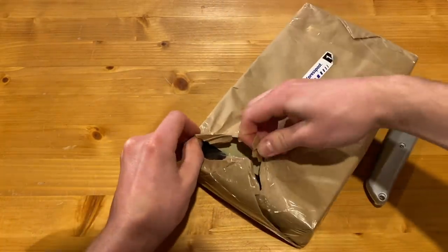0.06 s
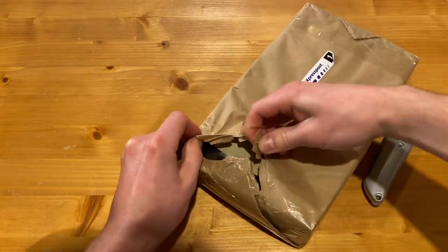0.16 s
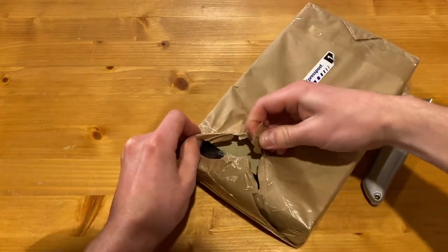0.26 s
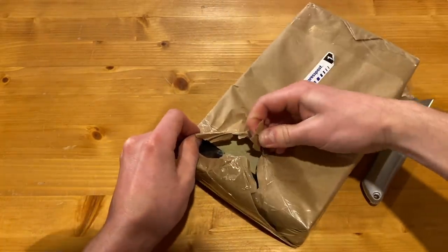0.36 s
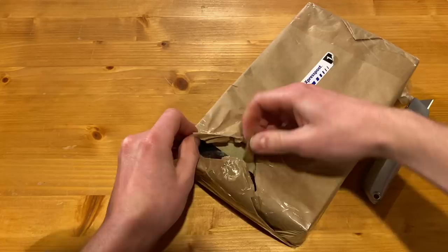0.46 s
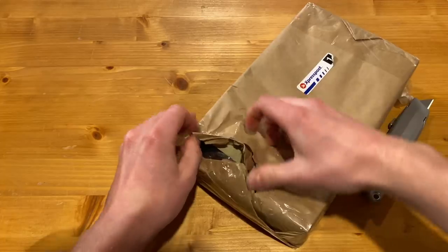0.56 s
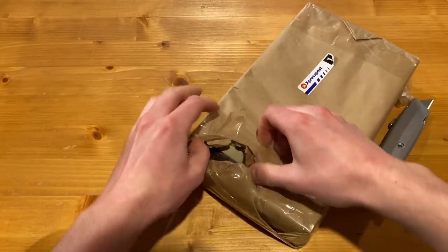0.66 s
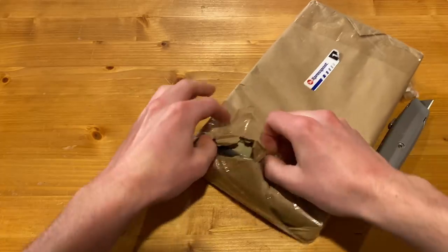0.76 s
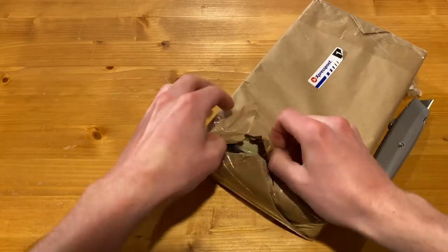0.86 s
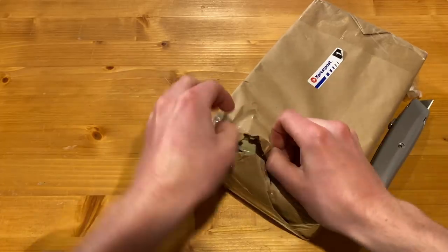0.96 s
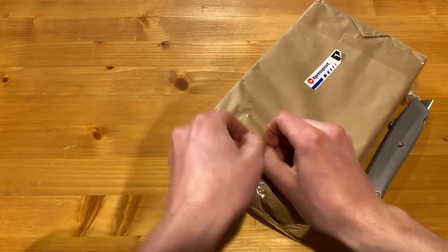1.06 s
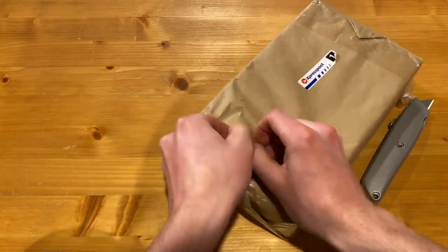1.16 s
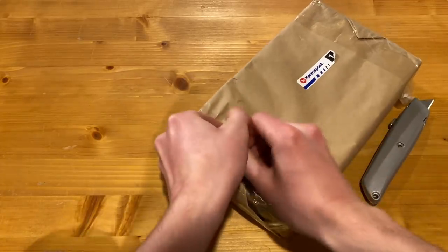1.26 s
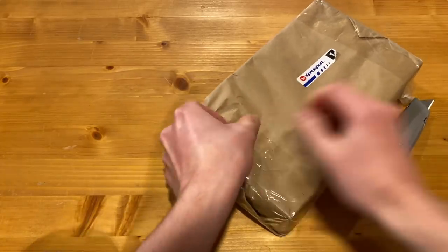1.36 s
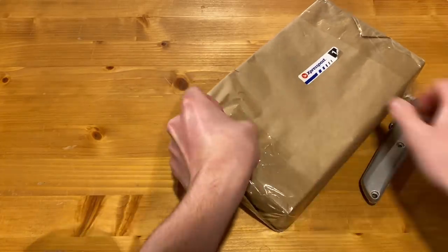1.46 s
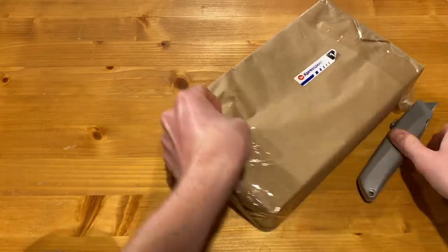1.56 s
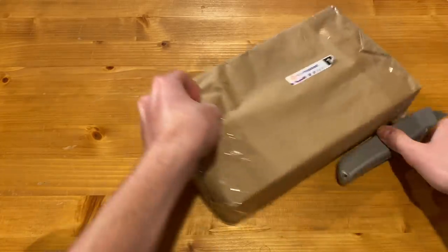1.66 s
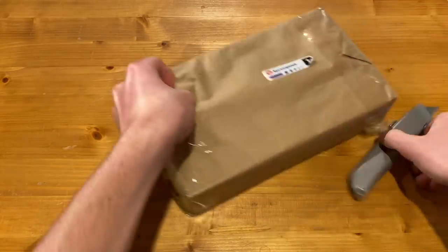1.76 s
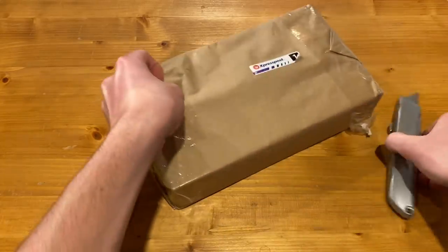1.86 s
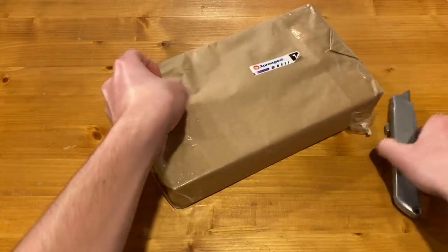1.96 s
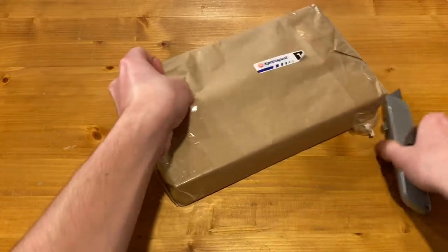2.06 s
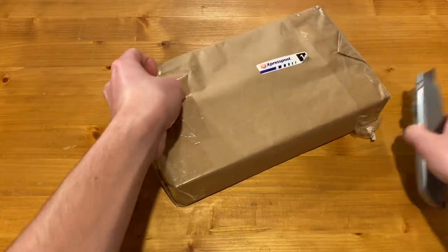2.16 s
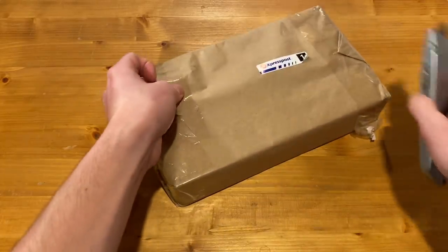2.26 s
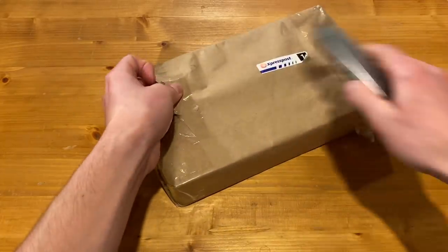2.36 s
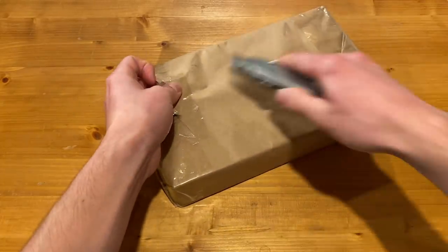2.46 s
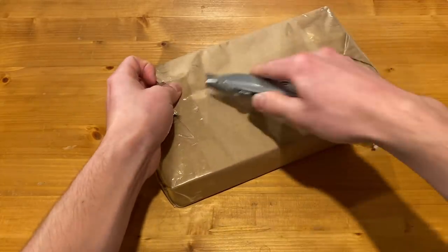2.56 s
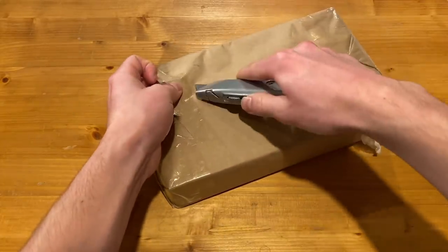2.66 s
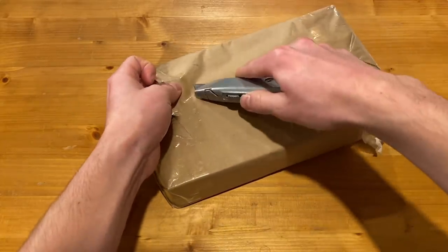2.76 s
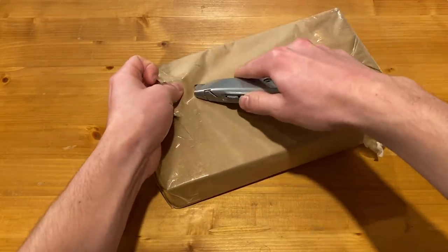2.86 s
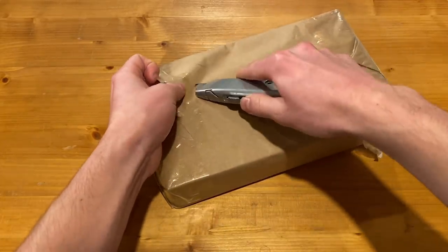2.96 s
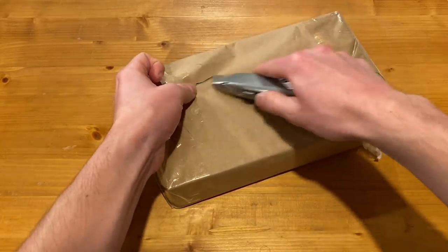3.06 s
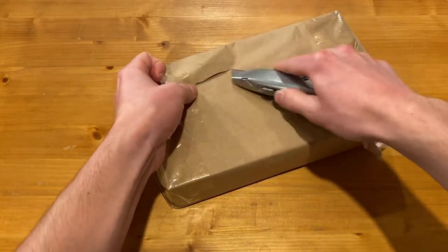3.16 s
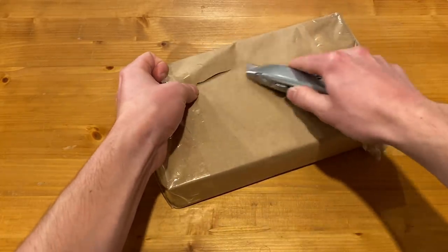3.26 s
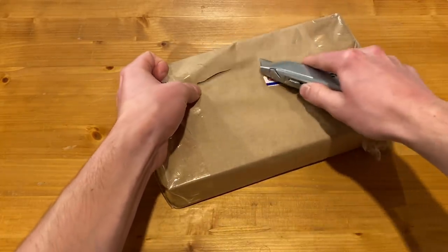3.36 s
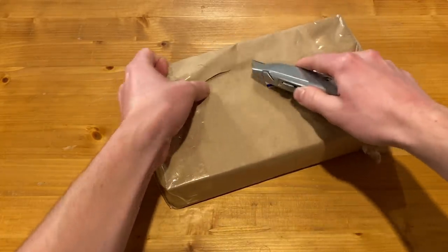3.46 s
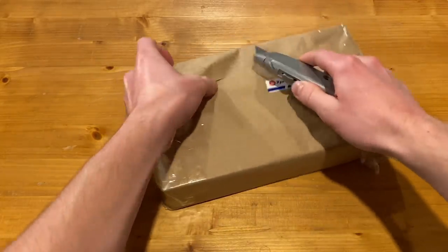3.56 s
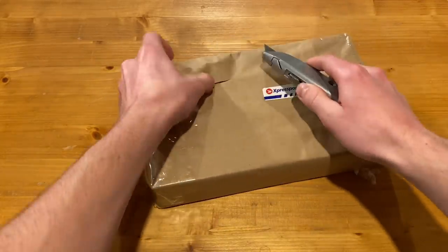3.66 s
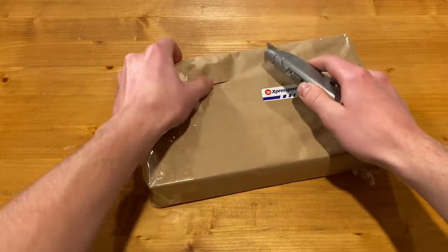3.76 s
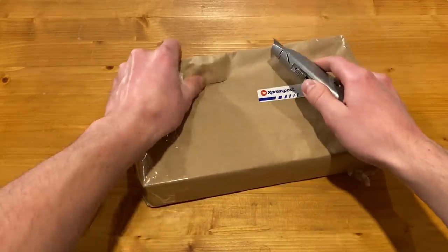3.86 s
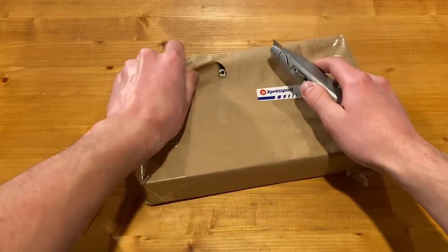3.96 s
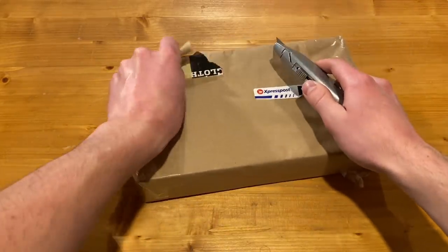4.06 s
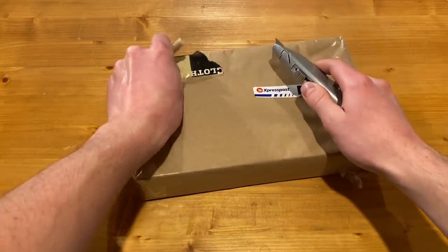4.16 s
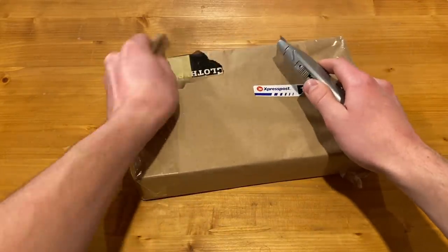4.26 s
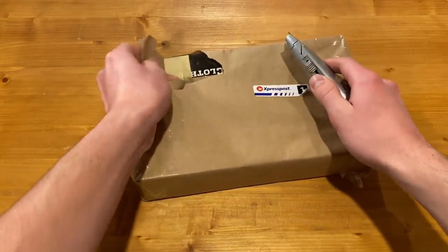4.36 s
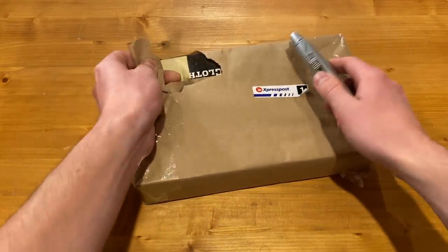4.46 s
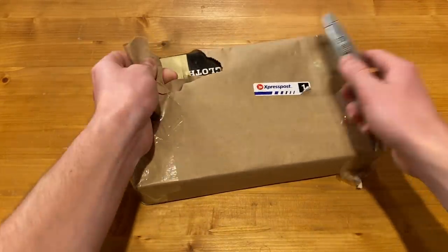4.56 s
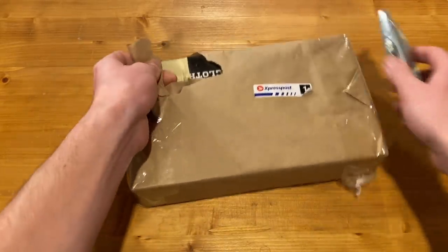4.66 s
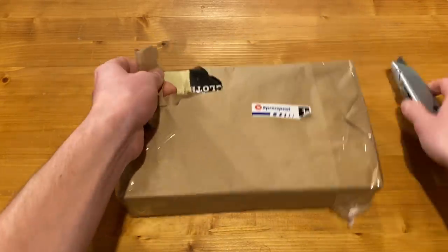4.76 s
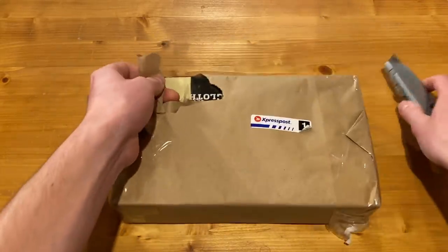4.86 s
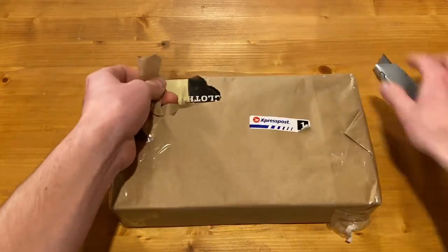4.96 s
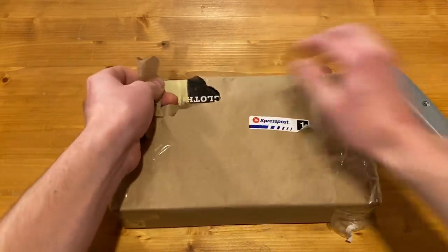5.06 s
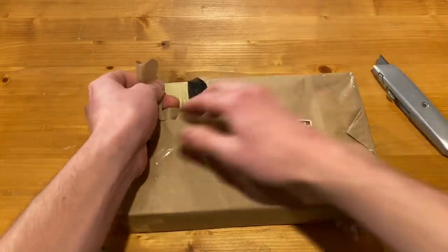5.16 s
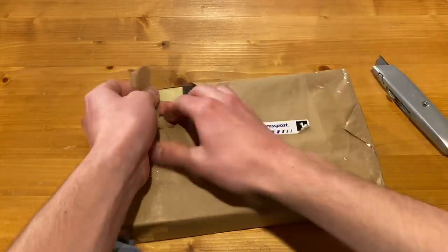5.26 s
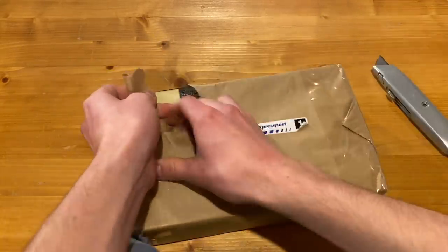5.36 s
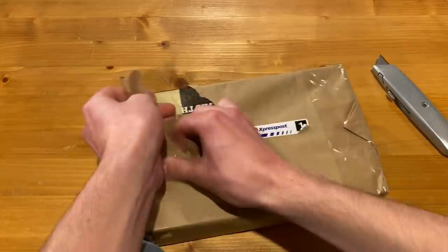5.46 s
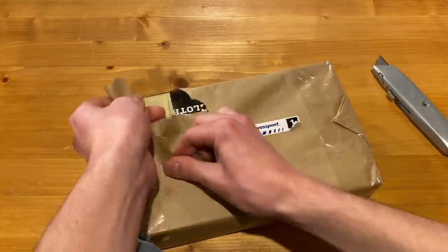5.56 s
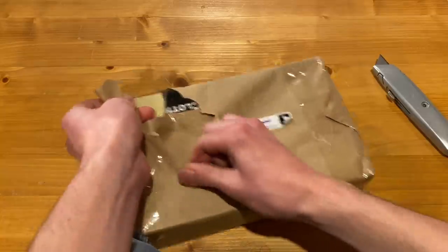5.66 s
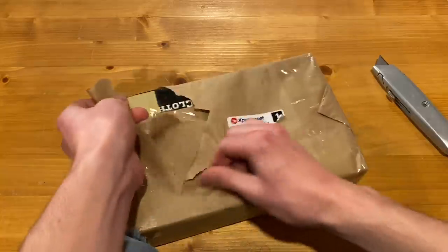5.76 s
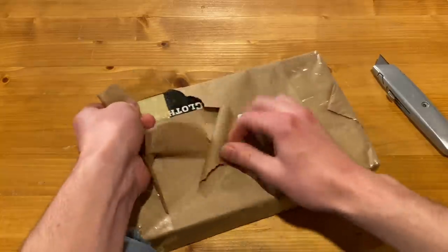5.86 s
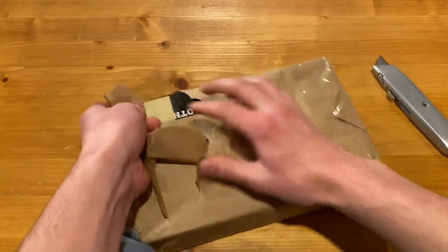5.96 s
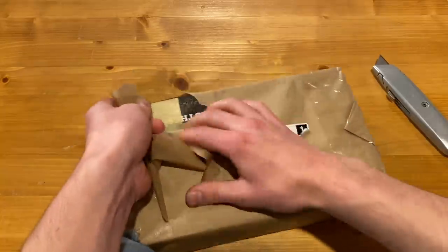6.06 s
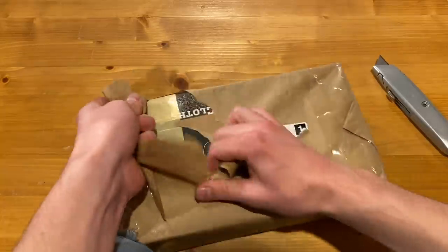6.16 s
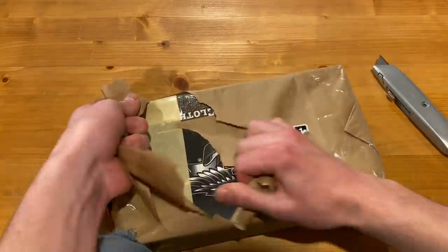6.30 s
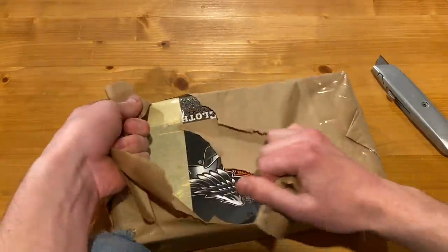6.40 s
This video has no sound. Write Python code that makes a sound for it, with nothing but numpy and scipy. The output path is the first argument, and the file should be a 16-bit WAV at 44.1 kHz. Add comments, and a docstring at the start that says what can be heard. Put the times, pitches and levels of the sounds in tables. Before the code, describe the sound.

Hands pick at stiff, taped wrapping paper on a hollow parcel, with light crackles and small pops. The parcel scuffs round on a wooden table, a blade rasps briefly, and a strip rips open. A metal knife is put down with a hard knock and small rattle, then the paper tears much louder. Close microphone, small quiet room.

```python
"""A quiet room with a wooden table: hands pick at, slit and tear the brown paper round a parcel.
Noise in dense grains makes the rustle, the blade's rasp and the scuff; short noise bursts make the snaps.
The hollow parcel booms through low resonances; fading sine tones make paper pops and the knife's knocks.
A finger makes the paper hum. The surface below echoes the paper, and the walls add a short tail."""
import sys
import numpy as np
from scipy import signal
from scipy.fft import rfft, irfft, next_fast_len
from scipy.io import wavfile
from scipy.ndimage import uniform_filter1d

SR = 44100
rng = np.random.default_rng(int(sys.argv[2]) if len(sys.argv) > 2 else 0)


def transcribe(u):
    """Save the signal u as a 16-bit wav file named by the first command-line argument.

    u: samples, shape (n,) or (channels, n), limited to [-1, 1]; the rate is SR.
    q: integer samples, one column per channel.
    """
    v = np.clip(np.atleast_2d(u).T, -1, 1)
    q = np.round(v * 32767).astype(np.int16)
    wavfile.write(sys.argv[1], SR, q)


N = 283563
TIME = np.arange(N) / SR  # seconds

# each move of the hands on the paper; swell and fade are the times for a 20 dB change:
# peak t/s, swell t/s, fade t/s, rustle level/dB, treble over middle level/dB, parcel boom level/dB
HAND_MOVES = [(0.0, .05, 0.11, -42.5, 5, -37.5), (0.294, 0.5, 0.11, -44, 5.5, -51),
              (.377, 0.04, .04, -49, 5, -52.5), (.493, 0.024, 0.13, -46, -0.5, -52.5),
              (.65, .05, 0.17, -47, 4, -60), (.705, .18, 0.069, -48, 5, -52.5),
              (.9, 1, 0.33, -54.5, 5, -61), (1.119, 0.059, 0.13, -45.5, 12, -53),
              (1.223, 0.12, 0.11, -45.5, 4, -52), (1.341, 0.047, 0.24, -53, 0, -50.5),
              (1.688, 0.45, 0.065, -49, 2.5, -50.5), (1.72, 0.027, 0.22, -41, 3, -47.5),
              (1.98, 0.08, 0.17, -56, -1, -61), (2.077, 0.044, 0.42, -51.5, 1, -53.5),
              (2.227, 0.07, 0.086, -51, -5, -55), (2.297, 0.039, .1, -56, 2, -56),
              (2.349, 0.11, 0.06, -49.5, 2, -53), (2.51, 0.098, 0.046, -52, -11, -65),
              (2.679, 0.011, .13, -42.5, -11, -53), (2.878, 0.17, 0.057, -41.5, 4.5, -51),
              (3.043, 0.028, 0.53, -45, 3, -54), (3.197, 0.47, 0.035, -48.5, -7, -56.5),
              (3.308, 0.047, 0.087, -48, 1, -56), (3.39, 0.11, .03, -49, -7, -56),
              (3.52, 0.026, .2, -59, -8, -62), (3.577, 0.0078, 0.22, -42, 3, -59),
              (3.702, 0.62, 0.26, -48.5, -9, -50), (3.869, 0.12, 0.15, -43.5, 0.5, -58),
              (4.029, 0.15, 0.059, -29.5, 9, -42), (4.118, 0.055, 0.071, -32, 1, -40.5),
              (4.308, 0.18, 0.4, -41.5, 4, -51.5), (4.46, 0.034, 0.038, -37, -12, -66),
              (4.633, 0.39, 0.23, -57.5, -6, -51.5), (4.77, 0.051, 0.43, -45.5, 1.5, -67),
              (4.933, 0.017, 0.11, -40, -2, -53), (5.242, 0.02, 0.038, -36, -1.5, -42.5),
              (5.28, 0.077, 0.12, -53, -5, -58), (5.428, 0.055, 0.075, -38.5, 0, -49),
              (5.49, 0.23, .1, -45, 8, -52), (5.536, 0.021, .12, -28.5, 0.5, -42),
              (5.647, 0.055, 0.055, -39, 5, -49), (5.733, 0.082, 0.11, -34, 1, -39.5),
              (5.795, 0.052, 0.26, -31, 8, -43), (5.85, .06, 0.079, -31.5, 5, -49),
              (5.896, 0.13, 0.042, -24, 0.5, -38.5), (5.95, 0.12, 0.21, -42, -15, -50),
              (6.078, 0.022, 0.1, -36, -8, -40), (6.168, 0.03, 0.37, -25.5, -1, -38.5),
              (6.27, 0.27, .4, -32.5, 9.5, -45), (6.4, 0.44, 0.33, -31.5, 2, -44.5)]


def undb(db):
    """Turn decibels into a plain gain."""
    return 10 ** (np.asarray(db) / 20)


def unit(x):
    """Scale a sound to an average (rms) level of 1."""
    return x / np.sqrt(np.mean(x ** 2))


def colour(x, points):
    """Shape the tone by gains in dB at given frequencies in Hz, joined by straight lines over log f."""
    hz, db = np.transpose(points)
    size = next_fast_len(len(x))
    log_f = np.log(np.maximum(np.fft.rfftfreq(size, 1 / SR), 1))
    gain = undb(np.interp(log_f, np.log(hz), db))
    return irfft(rfft(x, size) * gain, size)[:len(x)]


def band(x, hz, width_hz):
    """Let one resonance ring, with gain 1 at its centre."""
    hz = min(hz, .45 * SR)
    return signal.lfilter(*signal.iirpeak(hz, hz / width_hz, fs=SR), x)


def high_pass(x, hz):
    """Keep what lies above a frequency."""
    return signal.sosfilt(signal.butter(2, hz, "high", fs=SR, output="sos"), x)


def decay(t, t60_s):
    """Die away by 60 dB in the given time."""
    return np.exp(-np.log(1000) * t / t60_s)


def blend(first, second, db):
    """Mix two sounds, the first stronger by db, at constant power."""
    return (undb(db) * first + second) / np.hypot(1, undb(db))


def grains(spread_db, per_s, length_s):
    """Noise in short dying bursts at random moments, a few large among many small; rms near 1."""
    chance = rng.random((N, 2)).T
    sizes = undb(-spread_db * np.log(1 - chance[1]))
    hits = (chance[0] < per_s / SR) * sizes
    shape = signal.lfilter([1], [1, -np.exp(-1 / (length_s * SR))], hits)
    # even out the level over 1/16 s, so that only the grain remains
    local = np.sqrt(uniform_filter1d(shape ** 2, size=SR // 16)) + 1e-9
    return shape / local * rng.standard_normal(N)


def follow(table):
    """Read the columns of a table over time, sample by sample."""
    s, *columns = np.transpose(table)
    return [np.interp(TIME, s, c) for c in columns]


def swell(table, edge_s=.01):
    """Gain along a table of t/s and level/dB, closing at both ends."""
    s, db = np.transpose(table)
    edges = np.clip(np.minimum(TIME - s[0], s[-1] - TIME) / edge_s, 0, 1)
    return edges * undb(np.interp(TIME, s, db))


def surge(peak_s, swell_s, fade_s):
    """Power of each move, at every 64th sample: it rises and falls by 20 dB in the given times."""
    late = TIME[::64] - np.reshape(peak_s, (-1, 1))
    span = np.where(late < 0, -np.reshape(swell_s, (-1, 1)), np.reshape(fade_s, (-1, 1)))
    return undb(-40 * np.abs(late / span))  # 40, because this is power and not gain


def summed(power, db, rest_db):
    """Gain of overlapping moves, whose powers add to a resting level."""
    return np.interp(TIME, TIME[::64], np.sqrt(undb(db) ** 2 @ power + undb(rest_db) ** 2))


def hush():
    """The quiet room: steady noise, mostly low."""
    # tone of the room noise: f/Hz, level/dB per Hz
    room_tone = [(12, 3.5), (20, 0.5), (77, -12.5), (142, -68), (422, -27), (780, -67), (1400, -94),
                 (2080, -68), (8180, -69), (9670, -77), (16000, -49)]
    return undb(-56.5) * unit(colour(rng.standard_normal(N), room_tone))


def walls(near):
    """Walls send back a dense, quickly fading tail, made with decaying noise."""
    tail_db, t60_s, build_up_s = -11.5, 0.096, 0.0065
    t = np.arange(SR // 3) / SR
    reflections = rng.standard_normal(len(t)) * decay(t, t60_s) * np.minimum(t / build_up_s, 1)
    reflections = reflections / np.sqrt(np.sum(reflections ** 2))
    return undb(tail_db) * signal.fftconvolve(near, reflections)[:N]


def parcel(x):
    """The hollow box under the paper rings low."""
    # resonances of the box: f/Hz, width f/Hz, level/dB
    resonances = [(222.4, 62, -6.5), (374, 103.6, 4), (537, 630, -2.5), (905, 322, -2), (1640, 880, -21)]
    return sum((-1) ** k * undb(db) * band(x, hz, width)
               for k, (hz, width, db) in enumerate(resonances))


def weight():
    """Shifting pressure booms in the parcel; jolts also shake the lowest modes of the table."""
    # the parcel is jolted against the table: t/s, parcel boom level/dB, table rumble level/dB
    jolt_table = [(0.0, -50, -38), (.2, -48, -50.5), (1.22, -57, -62), (1.43, -59, -57), (1.77, -57, -51),
                  (2.02, -51.5, -51.5), (2.72, -53, -65), (3.04, -49, -67), (3.63, -55, -53.5),
                  (3.9, -51, -63), (4.12, -47, -56), (4.82, -62, -47.5), (4.99, -36.5, -37),
                  (5.232, -54, -52.5), (5.53, -47, -47), (5.87, -50, -48), (6.09, -46, -58),
                  (6.21, -36.5, -59), (6.32, -33, -70)]
    jolt_swell_s, jolt_fade_s = 0.065, 0.096
    rest_boom_db, rest_table_db = -65.5, -68.5  # a murmur remains between the moves
    s, swell_s, fade_s, *_, hand_db = np.transpose(HAND_MOVES)
    jolt_s, boom_db, table_db = np.transpose(jolt_table)
    jolts = surge(jolt_s, jolt_swell_s, jolt_fade_s)
    moves = np.vstack([surge(s, swell_s, fade_s), jolts])
    pressure = summed(moves, np.r_[hand_db, boom_db], rest_boom_db)
    push = blend(grains(2.0, 300, 0.0039), rng.standard_normal(N), 4.7)
    boom = unit(parcel(push))
    rumble = unit(band(band(rng.standard_normal(N), 132, 180), 132, 180))
    return pressure * boom + summed(jolts, table_db, rest_table_db) * rumble


def scuff():
    """The parcel is turned, paper on varnished wood: a dull, slightly catching rub made of grains."""
    # loudness of the rub: t/s, level/dB
    strength = [(1.56, -67), (1.584, -77), (1.594, -51), (1.672, -49), (1.686, -56), (1.844, -46.5),
                (1.944, -57.5), (1.97, -70)]
    # tone of the rub: f/Hz, level/dB per Hz
    tone = [(59, -38), (100, -2), (157, 4.5), (733, -2), (823, -10), (1070, 2), (2200, -25), (2860, -49),
            (4840, -120)]
    return unit(colour(grains(1.5, 1300, 0.0082), tone)) * swell(strength)


def knife():
    """Each contact with the table rings the same modes, brighter when hard; loose parts rattle on."""
    # the knife is laid down and bounces: t/s, peak level of the ring/dB, hardness from 0 to 1
    knocks = [(4.808, -45, 0), (4.921, -11.5, 0.75), (4.939, -47, 0.9), (4.984, -22, 0.36),
              (5.017, -34, 0.3), (5.053, -35, 0.24)]
    # modes of knife and table top: f/Hz, level before softening/dB, time to fall 60 dB t/s
    modes = [(93.5, -12, 0.1), (130, -3.5, 0.066), (219, -28, 0.088), (344, 1.5, 0.049), (540, -7.5, 0.099),
             (755, -27, 0.094), (911, -1, 0.083), (994, 11.5, 0.021), (1200, -4, 0.049), (1265, -6, 0.077),
             (1647, -11, 0.05), (1720, -10, 0.046), (2030, -13, 0.14), (2080, -11, .05), (2254, 3, 0.025),
             (2450, 2.5, 0.018), (2695, 4, 0.045), (4450, -13, .03), (10300, -18, .03)]
    rattle_db, rattle_t60_s = -9.5, 0.14
    out, t = np.zeros(N + SR), np.arange(SR // 3) / SR
    for s, db, hard in knocks:
        edge_hz = 150 * 60 ** np.clip(hard, 0, 1)  # a soft contact lasts longer and dulls the ring
        ring = np.zeros(len(t))
        for k, (hz, mode_db, t60_s) in enumerate(modes):
            strength = (-1) ** k * undb(mode_db) / np.hypot(1, (hz / edge_hz) ** 2)
            ring += strength * decay(t, t60_s) * np.sin(2 * np.pi * hz * t)
        ring = ring / np.abs(ring).max()
        rattle = undb(rattle_db) * rng.standard_normal(len(t)) * decay(t, rattle_t60_s)
        rattle = rattle / np.sqrt(SR * 0.005)
        i = int(s * SR)
        out[i:i + len(t)] += undb(db) * (ring + signal.fftconvolve(ring, rattle)[:len(t)])
    return out[:N]


def hum():
    """A finger drags on the taut paper and it hums: one short, low, gliding sine tone."""
    # path of the tone: t/s, f/Hz, level/dB
    path = [(5.172, 349.5, -70), (5.19, 336, -40.5), (5.214, 343, -51), (5.252, 370, -41.5),
            (5.27, 369, -72)]
    hz, _ = follow(path)
    gain = np.sqrt(2) * swell([(s, db) for s, _, db in path])  # root 2 makes the level an rms one
    return gain * np.sin(2 * np.pi * np.cumsum(hz) / SR)


def pops():
    """A slack panel of paper jumps in or out and rings briefly at its own pitch, sagging a little."""
    # each pop: t/s, peak level of its envelope/dB, starting f/Hz, time to fall 60 dB t/s
    panels = [(0.155, -40, 333, 0.073), (0.175, -36.5, 536, 0.056), (1.124, -50, 380, 0.02),
              (1.375, -38.5, 156, 0.031), (2.026, -40.5, 345, 0.036), (2.156, -38.5, 387, 0.045),
              (2.236, -40, 376, 0.044), (2.456, -48, 1014, 0.05), (2.715, -37.5, 395, 0.078),
              (2.869, -37.5, 355, 0.057), (3.185, -39, 459, 0.089), (3.594, -35.5, 417, 0.023),
              (3.643, -31.5, 247, 0.037), (4.104, -30.5, 273, 0.037), (4.772, -37.5, 345, 0.033),
              (5.361, -44.5, 340, 0.14), (5.643, -38, 227, 0.056), (5.734, -28, 436, 0.041),
              (5.948, -54, 730, 0.033), (6.03, -34, 380, 0.026), (6.082, -29.5, 364, 0.076),
              (6.33, -39, 500, 0.046)]
    out, t = np.zeros(N + SR), np.arange(SR // 8) / SR
    for s, db, hz, t60_s in panels:
        fall = (1 - np.exp(-t / 0.00058)) * decay(t, np.clip(t60_s, .01, .15))
        tone = np.sin(2 * np.pi * hz * t * (1 - 0.43 * t))
        i = int(s * SR)
        out[i:i + len(t)] += undb(db) * fall / fall.max() * tone
    return out[:N]


def rasp():
    """Fibres break so fast along a cut or rip that their grains merge into a dense scrape."""
    # the blade slits the sheet, later a strip is ripped; one list for each: t/s, level/dB
    strokes = [
        [(3.02, -53), (3.046, -38), (3.064, -43), (3.14, -37.5), (3.18, -42.5), (3.196, -44), (3.25, -59)],
        [(3.96, -38), (3.966, -41), (4.046, -33), (4.06, -38), (4.11, -37), (4.17, -55)],
    ]
    # resonances of the scrape: f/Hz, width of the first filter f/Hz, level/dB
    resonances = [(2000, 520, -16), (3420, 2900, 8), (6340, 1500, 5), (9700, 2000, 4.5)]
    fibres = grains(0.72, 5000, 0.0022)
    scrape = sum(undb(db) * band(band(fibres, hz, width), hz, 2 * width)
                 for hz, width, db in resonances)
    return unit(scrape) * sum(map(swell, strokes))


def snaps():
    """Each crease flips in a brief burst that rings its patch of paper, thumps the parcel and settles."""
    # creases that snap, levels before filters and echo:
    # t/s, peak level/dB, ring f/Hz, top treble level/dB, thump level/dB, length t/s (held to 0.4-30 ms)
    creases = [(.0089,-21,8600,1,-45,.001),(0.021,-22,8300,2,-31,0.0045),(.0864,-27,2550,0,-40,.0047),(.091,-25,8200,-3,-36,.0019),(0.112,-25.5,8760,-6,-43,0.0013),(0.15,-26.5,7400,-14,-33,0.004),(0.175,-25,6700,-17,-29,0.0012),(.216,-22,2560,-2,-57,0.0015),(0.224,-20.5,4590,3,-48,.001),(0.246,-21,7520,6,-54,.0012),(0.2837,-18,8900,4,-40,0.0022),(0.2896,-22,6630,-6,-28,0.0015),(.301,-25,3530,-4,-42,0.0015),(.3567,-25.5,8400,11,-50,.0017),(.4665,-34,8010,7,-46,.0007),(0.485,-33,7900,-8,-41,0.0014),(0.49,-29,8530,-9,-28,0.00058),(0.5245,-29,3620,1.5,-42,0.0094),(0.59,-30.5,4740,1,-47,0.0011),(.635,-35,7490,-6,-43,.0013),(.66,-28,7100,-12,-40,0.0014),(.699,-32,4140,-6,-38,.0023),(0.74,-39,4950,-8,-47,0.0014),(.8212,-33.5,4600,-3,-41,0.0016),(0.866,-32.5,3630,-17,-63,0.00082),(0.8913,-26,6700,-16,-64,0.0013),(0.945,-35.5,8900,5,-62,0.0024),(0.9656,-38,2840,7,-40,0.0069),(1.067,-35.5,4050,-8,-42,0.0019),(1.0832,-29.5,7200,-7,-34,0.00097),(1.108,-31,7060,-8,-54,0.0009),(1.116,-35.5,8350,-11,-36.5,0.0088),(1.1905,-29,8400,12,-49,.0024),(1.2086,-21,8400,10,-48,0.001),(1.211,-24.5,8440,2,-31.5,0.0022),(1.255,-33,7880,-5,-47,.0016),(1.3125,-30,6850,-5,-63,.0027),(1.338,-31.5,3880,2,-36.5,0.0023),(1.533,-34,8500,-11,-57,.0013),(1.5446,-35,2820,-12,-31,0.0012),(1.628,-26.5,6660,-18,-41,0.00059),(1.655,-35.5,4100,-28,-40.5,0.0063),(1.699,-30,4550,2,-52,0.01),(1.732,-26.5,4500,3,-34,0.0014),(1.8227,-28,4200,0,-46,0.0064),(1.862,-27,3770,-14,-42,.0011),(1.914,-30.5,8400,3,-62,.005),(2.02,-37,5170,-21,-53,.011),(2.0704,-32.5,4030,-3,-58,0.0052),(2.102,-25,6400,-22,-44,0.0018),(2.1276,-31,4820,-9,-54,.0031),(2.1525,-27.5,3980,-9,-37.5,0.0025),(2.2248,-26,3680,9,-41,.0014),(2.2334,-29,4250,-9,-35.5,0.0029),(2.2695,-31,9200,-2,-59,.0009),(2.278,-23.5,10100,4,-49,0.003),(2.293,-24,2920,-15,-55,0.002),(2.3222,-16.5,9800,7.5,-53,0.00032),(2.338,-29,7900,-3,-41,.0029),(2.385,-38,4050,2,-66,0.0041),(2.432,-38,4570,9,-65,.0057),(2.459,-35,3870,-2,-47,0.0028),(2.495,-33,3640,-10,-40.5,0.0044),(2.511,-27,4420,-10,-40,0.002),(2.6015,-44,9700,-3,-52,0.0015),(2.671,-30.5,3470,5,-66,0.0025),(2.6895,-19.5,4220,-12,-51,0.003),(2.7187,-34,2600,-15,-39,0.0039),(2.7274,-19,9400,-12,-42,0.00096),(2.776,-33,8950,-1,-43,0.0057),(2.814,-31,9820,-3,-54,.0009),(2.836,-25,9700,8,-40,.001),(2.8507,-26,9500,-14,-55,0.001),(2.866,-28.5,9350,-12,-43.5,0.007),(2.966,-34,2730,5,-47,.0022),(2.998,-31.5,2640,-17,-57,0.0042),(3.023,-31,3700,-3,-46,.0016),(3.1954,-28,3480,-30,-61,0.0028),(3.2928,-24,3340,-23,-35,0.0057),(3.37,-36.5,6400,-17,-37,0.0041),(3.429,-35.5,9100,-8,-68,0.0014),(3.5367,-39,3960,-19,-42.5,0.0044),(3.5576,-23,6840,-10,-47,0.0029),(3.5847,-18.5,5860,-9,-38,0.0014),(3.6386,-16.5,10600,-8,-33.5,0.0045),(3.666,-21.5,2690,-21,-52,0.0023),(3.69,-14.5,2780,2,-41,0.003),(3.7,-21.5,2670,-17,-55,0.0021),(3.773,-19.5,4600,-19,-44,0.0027),(3.806,-29,2740,-6,-55,0.0012),(3.8219,-26,4070,-14,-49,.0014),(3.868,-27.5,9000,-10,-56,.0033),(3.925,-12.5,6400,4,-29,0.00031),(3.9507,-25,2450,-19,-46,0.0025),(3.959,-20,2500,-1,-55,0.0021),(3.977,-11.5,6640,4,-42,.0018),(4.016,-17.5,2980,3,-40,0.0042),(4.029,-15,5800,2,-37,0.0023),(4.041,-21,3040,-14,-47,.0036),(4.078,-16.5,3200,-13,-59,0.0013),(4.0866,-19,3230,-11,-39,.0013),(4.102,-13,3100,-19,-43,0.0013),(4.106,-18,3250,-18,-32,.0031),(4.1118,-16.5,4700,-16,-42,.011),(4.1307,-23.5,2920,-2,-30.5,.0037),(4.312,-22.5,2680,-6,-41,0.0043),(4.319,-23.5,7160,-8,-45,0.0037),(4.373,-29,3370,0,-60,0.0027),(4.4075,-20,3270,-14,-59,.0005),(4.453,-26.5,2920,3,-57,0.0087),(4.462,-28,2840,-18,-52,0.0082),(4.4847,-31,3320,-4,-38,0.0066),(4.508,-32,6760,-14,-44,0.0042),(4.587,-36,3430,-10,-44,0.0026),(4.629,-23.5,8800,-11,-38.5,0.0018),(4.759,-32,5060,1,-53,0.019),(4.867,-31.5,4160,-10,-53,0.0013),(4.9214,-13,2870,2,-11.5,0.0038),(5.108,-34.5,9050,-12,-51,0.0025),(5.2354,-20.5,4200,4,-25,0.0012),(5.388,-28,3040,-18,-37,0.0019),(5.408,-24.5,7600,-17,-52,0.003),(5.4205,-21,2900,0,-37,0.0012),(5.4253,-19,2700,-2,-35,0.0011),(5.4414,-19.5,4770,6,-36.5,0.0023),(5.494,-24,10800,3,-38.5,.0066),(5.5237,-2,9530,-1,-15.5,0.0061),(5.538,-17,3100,-8,-52,.0048),(5.561,-24,2570,-5,-43,.014),(5.6214,-28.5,4390,-7,-47,.0016),(5.6343,-20,3040,2,-44,0.0027),(5.6432,-22,3100,-9,-32,0.0024),(5.687,-19.5,2920,-3,-31,0.0035),(5.698,-24.5,4600,-16,-48,0.0024),(5.7246,-19,4430,3,-34,0.0064),(5.7327,-24,4540,-8,-21.5,.0041),(5.7812,-11.5,9100,-14,-23.5,0.0078),(5.831,-16,8850,-15,-48,.0023),(5.837,-13,4740,1,-31,.0058),(5.846,-12,9200,-8,-27,.0086),(5.856,-17,7500,3,-34,0.019),(5.885,-9,8200,-20,-32,0.0069),(5.9004,-16,5070,5,-30.5,0.0062),(5.915,-23,4350,-10,-47,.0028),(5.948,-13,3300,-18,-30,0.0011),(5.965,-13.5,4800,2.5,-47,0.0025),(6.024,-26.5,1870,-25,-36.5,0.006),(6.066,-28,4300,-20,-38,.003),(6.151,-20.5,7460,6,-35.5,0.02),(6.176,-21,7200,-19,-28.5,0.017),(6.201,-11.5,8000,-24,-29,0.0056),(6.2555,-14.5,7600,-3,-26,0.0017),(6.331,-11,9200,-5,-21,0.0012),(6.355,-11.5,4340,4,-29,0.0013)]
    settle_db, settle_t60_s = -22.5, 0.095
    paper, push = np.zeros(N + SR), np.zeros(N + SR)
    t = np.arange(SR // 12) / SR
    for s, db, hz, top_db, thump_db, length_s in creases:
        body_noise, top_noise, thump_noise = rng.standard_normal((3, len(t)))
        length_s = np.clip(length_s, .0004, .03)
        flip = np.exp(-(t / length_s) ** 2)
        settling = undb(settle_db) * decay(t, settle_t60_s)
        # a longer crease also takes longer to get going
        fall = np.minimum(t / (0.38 * length_s), 1) * (flip + settling)
        ring = unit(band(body_noise, hz, 0.078 * hz))
        crack = 1.2 * unit(band(body_noise, 3800, 7100))
        top = undb(top_db) * unit(band(top_noise, 9600, 2700))
        burst = fall * (ring + crack + top)
        i = int(s * SR)
        paper[i:i + len(t)] += undb(db) * burst / np.abs(burst).max()
        push[i:i + len(t)] += undb(thump_db) * thump_noise * fall ** 1.8
    # divide by the box's own gain for plain noise
    thumps = parcel(push[:N]) / np.std(parcel(rng.standard_normal(SR)))
    return high_pass(paper[:N], 1500), thumps


def rustle():
    """Fibres part and paper rubs; limp and stiff patches crackle below and above a dividing pitch."""
    # tone of the paper: f/Hz, level/dB per Hz
    paper_tone = [(530, -11), (900, -9), (1150, -8), (1440, 5.5), (2040, -4.5), (2600, 2.5), (3260, -1),
                  (5610, -1.5), (7680, -3.5), (11700, -4), (16000, -19.5)]
    split_hz, rest_db = 5630, -79  # the paper still whispers between the moves
    s, swell_s, fade_s, db, treble_db, _ = np.transpose(HAND_MOVES)
    power = surge(s, swell_s, fade_s)
    limp_db = db - 10 * np.log10(1 + undb(treble_db) ** 2)
    # crackle stands 4.5 dB over hiss when the rustle is at -47.5 dB; louder tearing merges into hiss
    loudness_db = 20 * np.log10(summed(power, db, rest_db))
    crackle_db = 4.5 - 0.16 * (loudness_db + 47.5)
    # the two patches share some of their grains
    shared, *own = (grains(spread_db=10, per_s=650, length_s=0.0027) for _ in range(3))
    patches = []
    for mine in own:
        crackle = blend(mine, shared, 2.1)
        patches.append(colour(blend(crackle, rng.standard_normal(N), crackle_db), paper_tone))
    limp = signal.sosfilt(signal.butter(2, split_hz, fs=SR, output="sos"), patches[0])
    stiff = high_pass(patches[1], split_hz)
    return (summed(power, limp_db, rest_db) * unit(limp)
            + summed(power, limp_db + treble_db, rest_db) * unit(stiff))


def echo(paper):
    """The flat surface below the hands sends back one late copy, which combs the tone."""
    # the delay follows the height of the hands: t/s, first peak of the comb f/Hz, strength from 0 to 1
    surface = [(0, 3800, 0.13), (.95, 3800, 0.35), (1.2, 4330, 0.33), (1.8, 4300, 0.42), (2.3, 3470, 0.23),
               (3.1, 3460, 0.19), (4.0, 3030, 0.42), (4.4, 3380, 0.6), (4.85, 3800, .35), (5.5, 3420, 0.25),
               (5.8, 4060, 0.1), (6.43, 3660, 0.18)]
    comb_hz, share = follow(surface)
    share = np.clip(share, 0, .95)
    late_copy = np.interp(TIME - 1 / comb_hz, TIME, paper)  # one period of the comb late
    return (paper + share * late_copy) / np.hypot(1, share)


def scene():
    """Add all sources, the short tail of the walls and the hush of the room."""
    creases, thumps = snaps()
    paper = echo(rustle() + creases + rasp())
    near = paper + thumps + weight() + knife() + hum() + scuff() + pops()
    return (near + walls(near) + hush())[None]


def record(dry):
    """The treble softens above 9 kHz and drops steeply near 15.8 kHz; little remains above 16.5 kHz."""
    treble_drop = [(20, -1), (9000, 0), (12000, -5), (15600, -12), (15900, -35)]  # f/Hz, level/dB
    soft = np.array([colour(x, treble_drop) for x in dry])
    return signal.sosfilt(signal.ellip(8, .2, 70, 16500, fs=SR, output="sos"), soft)


dry = scene()
out = record(dry)
transcribe(out)
```